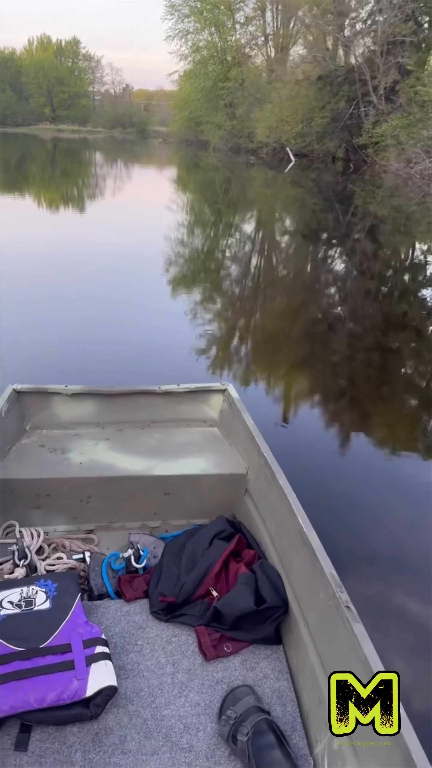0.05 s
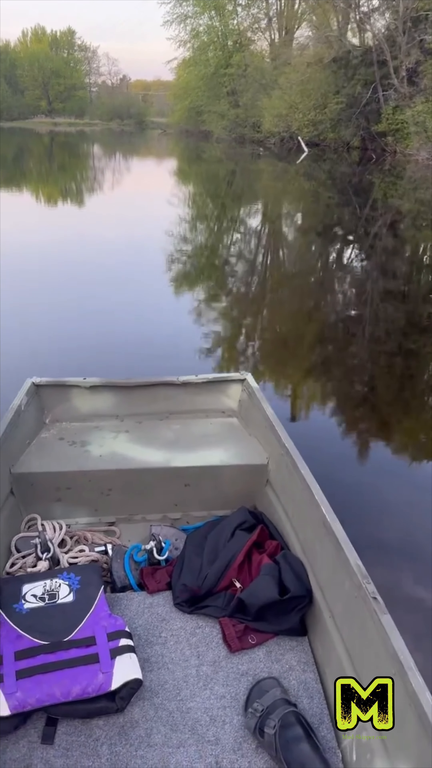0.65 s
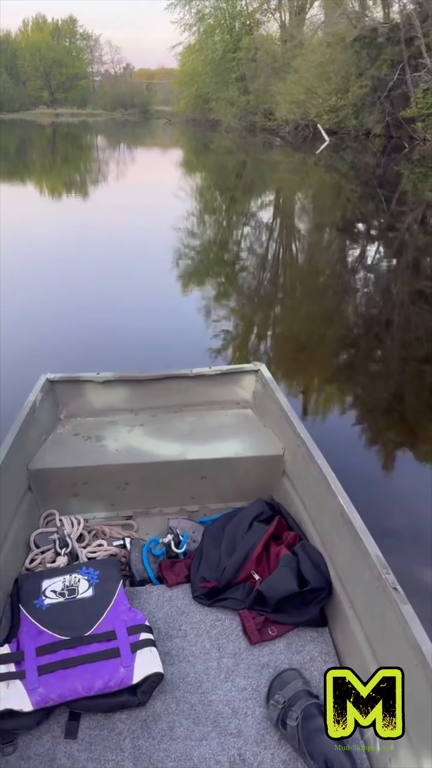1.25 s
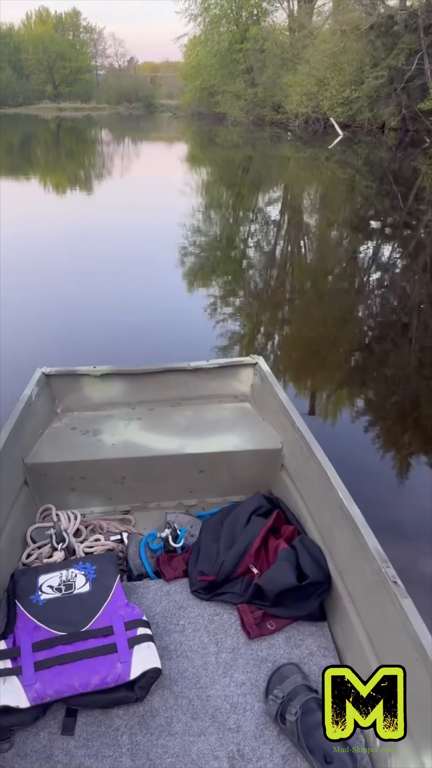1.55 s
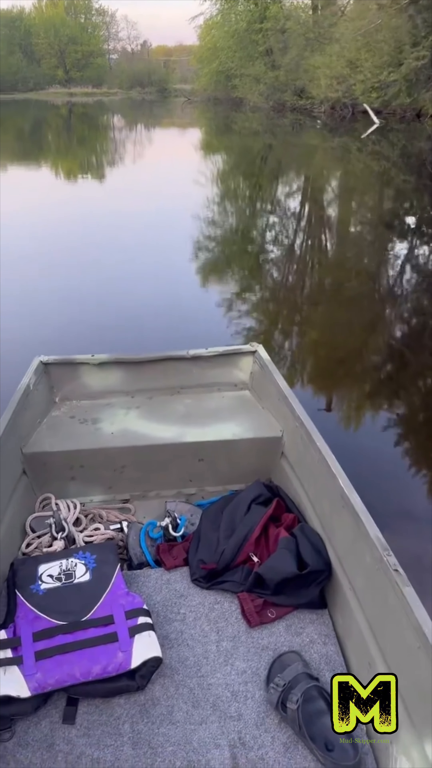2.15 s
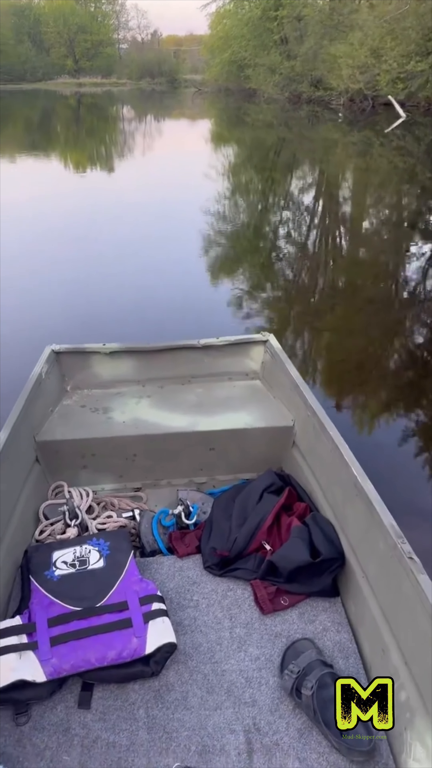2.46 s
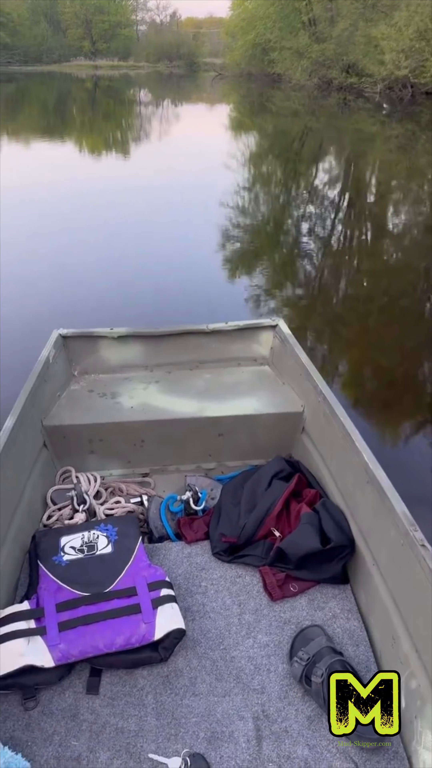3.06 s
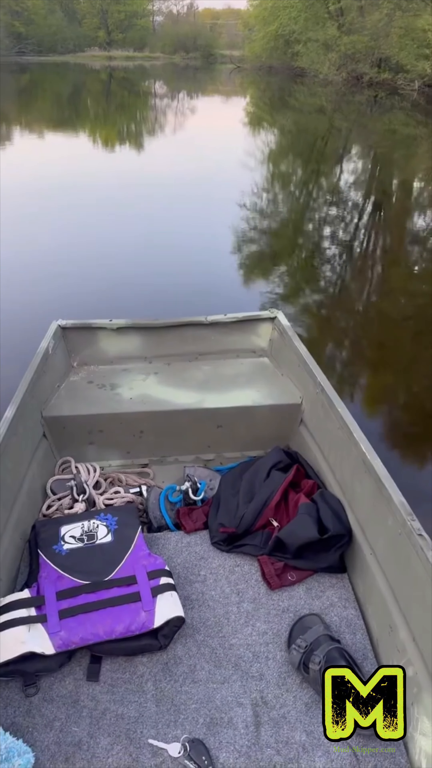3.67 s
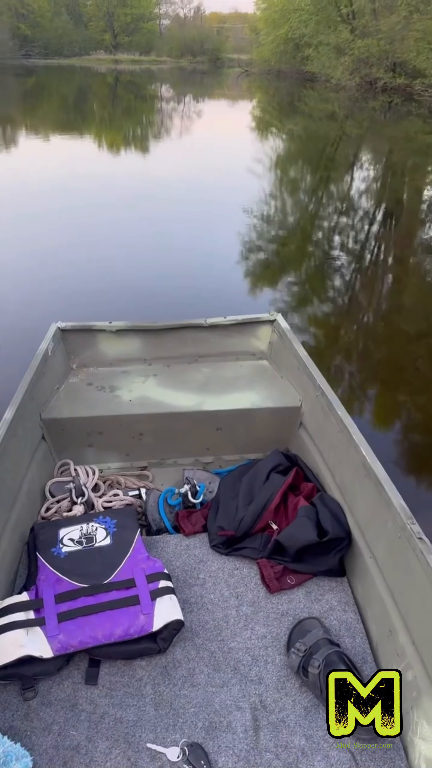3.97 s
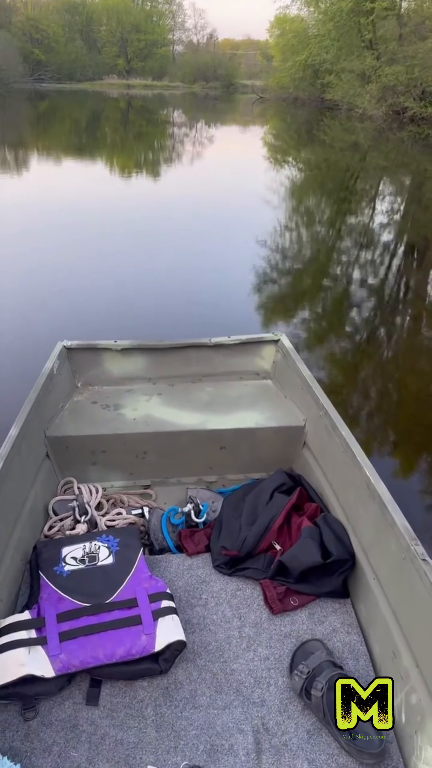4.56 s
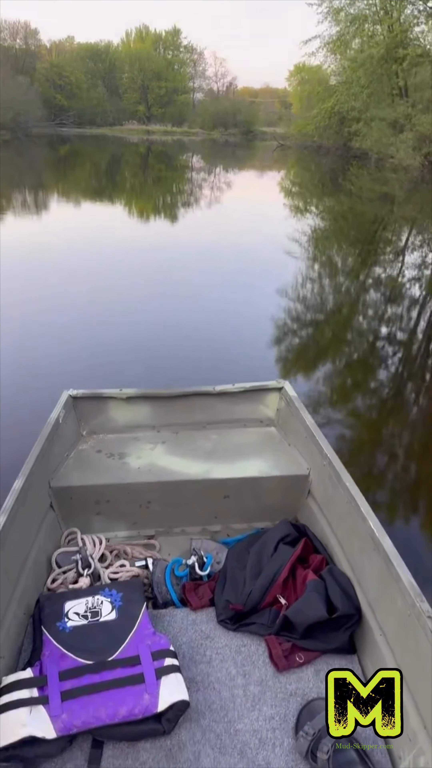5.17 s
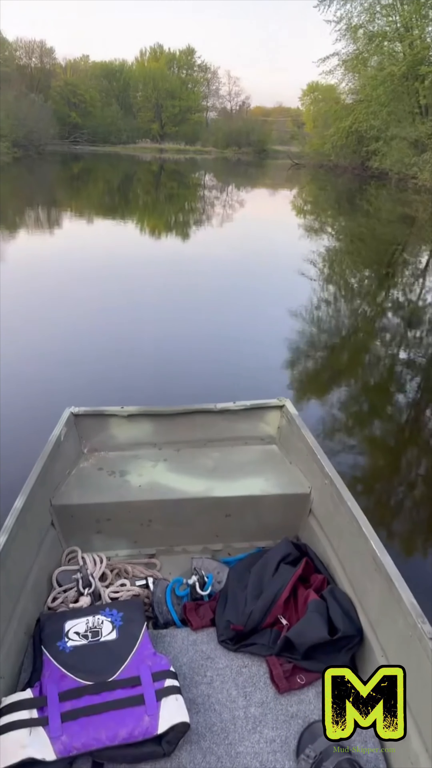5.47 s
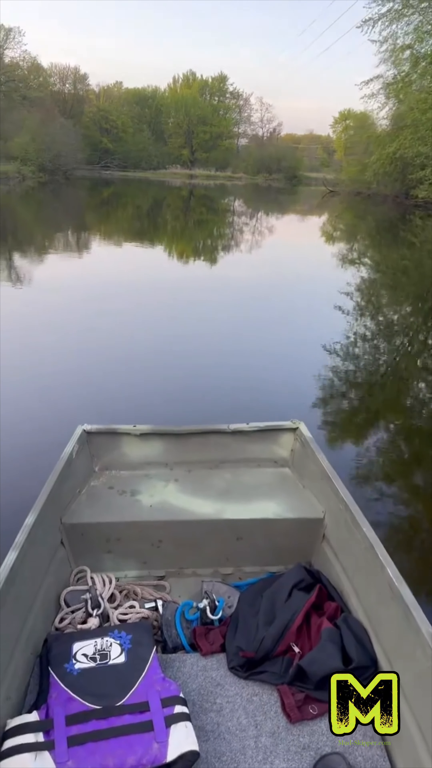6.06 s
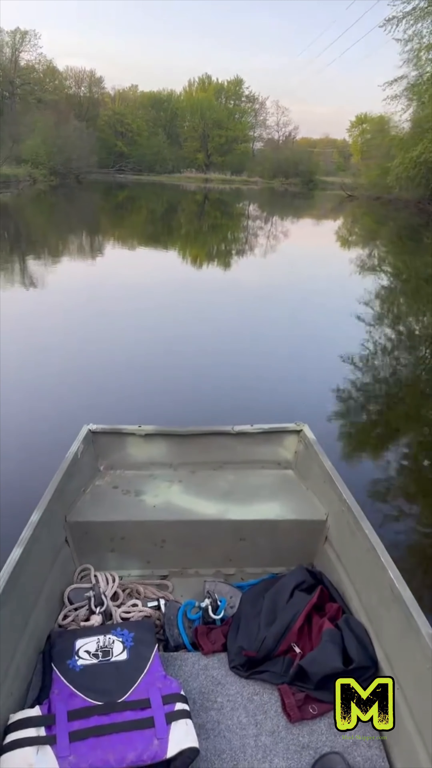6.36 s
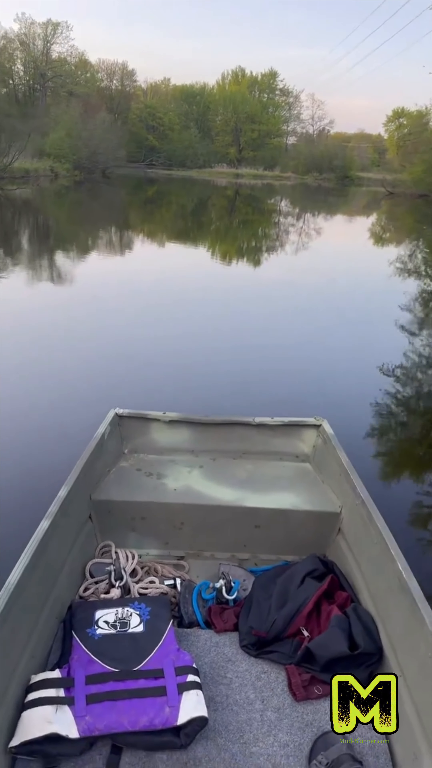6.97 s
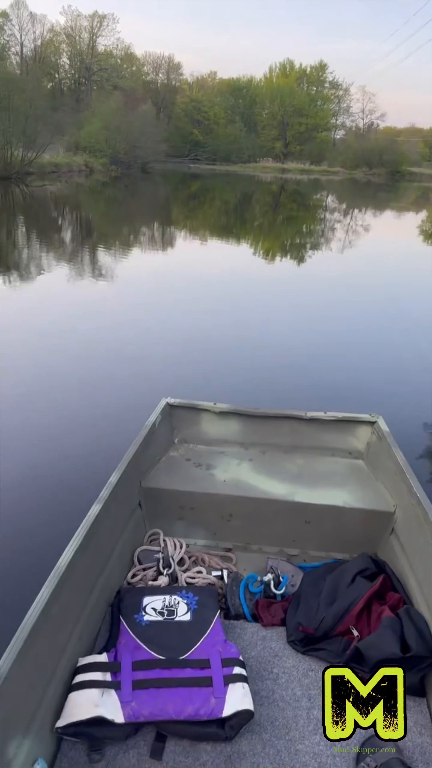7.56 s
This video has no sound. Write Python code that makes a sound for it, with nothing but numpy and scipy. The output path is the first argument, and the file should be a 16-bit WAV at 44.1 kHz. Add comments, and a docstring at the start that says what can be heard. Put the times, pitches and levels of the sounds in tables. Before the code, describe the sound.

Heard close from inside a small aluminium boat on calm water, a motor drones low and even from start to finish. Uneven firings add a rumble, while fast metallic clatter and short spells of panel buzz ride above it, along with a soft exhaust hiss and tiny ticks. The hull's boom dips briefly a few times, but the engine speed barely changes.

```python
"""A deep, steady engine drone fills a small aluminium boat on a calm river, heard on a phone held in
the open hull, a metre or two from the single-cylinder four-stroke long-tail motor. Each two-turn cycle
shakes the hull and uneven firings add rumble. The valve gear clacks and rattles, a loose panel buzzes in
spells, and gas hisses once a cycle with a thin tick; early echoes colour the treble."""
import sys
import numpy as np
from scipy import signal
from scipy.fft import rfft, irfft, next_fast_len
from scipy.io import wavfile
from scipy.ndimage import uniform_filter1d

SR = 44100
rng = np.random.default_rng(int(sys.argv[2]) if len(sys.argv) > 2 else 0)


def dump(signal):
    """Clip the signal to [-1, 1] and save it as 16-bit WAV at the path in sys.argv[1]."""
    limited = np.clip(np.atleast_2d(signal).T, -1, 1)
    pcm = np.round(limited * 32767).astype(np.int16)
    wavfile.write(sys.argv[1], SR, pcm)


N = 344855
TIME = np.arange(N) / SR

# pressure swings in one engine cycle: place/cycles, push (+) or pull (-)
STROKES = [(0.204, -0.52), (0.512, 0.77), (0.813, -0.497)]
# valve and piston knocks: place/cycles, relative level/dB
KNOCKS = [(0.025, 1), (0.273, -16.5), (0.469, -9), (0.769, -6), (0.867, -6)]


def drone(cycle, crank_db, boom_db, pipe_db, hull_below_hz=140, boom_order=6, upper_hz=380):
    """Multiples of the firing rate, timed by the strokes: the hull has the low ones, the pipe the rest."""
    # drone lines: multiple of the firing rate, relative left level/dB, relative right level/dB
    lines = [(1, -34, -30), (2, 0.5, 0.64), (3, -7, -8), (4, -13.5, -12.5), (5, -27, -21.5), (6, -2, -1),
             (7, -27.5, -28), (8, -16.5, -20), (9, -15, -13.5), (10, -18.5, -16.5), (11, -22, -24),
             (12, -20.5, -20.5), (13, -18, -15.5), (14, -18.5, -18), (15, -14.5, -41.5), (16, -18, -19.5),
             (17, -23.5, -35.5), (18, -20.5, -25), (20, -42.5, -35.5), (22, -27, -43), (23, -38, -37),
             (24, -31, -38.5), (25, -25.5, -34), (26, -25.5, -30.5), (29, -33, -34.5), (36, -31, -31.5),
             (49, -33.5, -41.5), (50, -42.5, -37), (56, -39.5, -36), (60, -43.5, -37)]
    # phase between left and right; the low lines sound centred, the midrange lines wide:
    # f/Hz, lead of the left/rad
    stereo_phase = [(60, 0.08), (125, 0.32), (187, 0.38), (250, 0.27), (320, 0.1), (490, 0.12), (560, 4.25),
                    (800, 2.97), (1030, 2.9), (1130, 3.14), (1500, 2.75), (1850, 2.75)]
    # dips and swells of the fourth line: t/s, gain/dB
    fourth_swells = [(0.0, 2), (0.75, -7), (1.25, -1), (1.8, 3), (2.45, -4), (2.7, 0), (3.55, -10),
                     (4.05, 0), (5.2, 1.8), (6.5, 2.5), (7.3, -0.5), (7.8, 3)]
    # swells of the lines above upper_hz: t/s, gain/dB
    upper_swells = [(0.0, 0.8), (1.2, 0.5), (2.6, -1.5), (4.1, 0.5), (5.8, -1), (6.3, 0.6), (7.8, 2)]
    at, push = np.transpose(STROKES)
    fourth_db, = curves(fourth_swells)
    upper_db, = curves(upper_swells)
    out = np.zeros((2, N))
    for order, left_db, right_db in lines:
        order = round(order)
        hz = order * cycle[-1] / TIME[-1]
        stroke_phase = np.angle(np.sum(push * np.exp(-2j * np.pi * order * at)))
        lead = np.interp(hz, *np.transpose(stereo_phase)) * np.array([[.5], [-.5]])
        drift = .09 * min(hz / 400, 1) * walk(22)  # hot gas shifts the upper lines a little
        if hz < hull_below_hz:  # the shaking of the crank is nearly steady
            db = crank_db + .5 * walk(14) + fourth_db * (order == 4)
        elif order == boom_order:
            db = boom_db
        else:  # the gas pulses vary
            db = pipe_db + 1.2 * walk(6) + upper_db * (hz > upper_hz)
        tone = np.cos(2 * np.pi * order * cycle + stroke_phase + drift + lead)
        out += undb([[left_db], [right_db]]) * undb(db) * tone
    return np.sqrt(2) * out


def hull_boom_db(firing_hz, steady_db=-30, db_per_sag_hz=17):
    """The hull booms louder as the engine sags under load and fades as the speed recovers."""
    return steady_db + db_per_sag_hz * (np.mean(firing_hz) - firing_hz)


def rumble(cycle, firing_at=.85, kick_db=-10, thud_width=.54):
    """Each firing kicks the hull harder or softer, and every stroke leaves a random thud."""
    # rumble spectrum: f/Hz, relative mid level/dB, relative side level/dB
    spectrum = [(25, -23, -39), (50, -15.5, -31), (120, -2, -25), (177, -4.5, -15.5), (245, -3, -18),
                (307, -9.5, -13), (442, -13, -9.5), (535, -8.5, -12), (593, -19, -14.5),
                (823, -24.5, -20.5), (920, -46, -42.5), (2000, -63.5, -80.5)]
    thuds = sum(abs(push) * burst(cycle, at + thud_width / 2, thud_width) for at, push in STROKES)
    envelope = unit(4.8 + thuds)
    kicks = unit(strikes(cycle, firing_at, rng.uniform(-.86, 1, cycle_count(cycle))))
    kicks = signal.sosfiltfilt(butter(2, 230, "low"), kicks)
    gas = carry_over(rng.standard_normal((2, N)), cycle, share=.4, above_hz=300)
    noise = coloured(envelope * gas + undb(kick_db) * kicks, spectrum)
    upper = signal.sosfiltfilt(butter(2, 380, "high"), noise)
    return noise + upper * (pan(db=9.5) - .9)  # the upper exhaust notes come more from the left


def hum(cycle, order=3.5, level_db=-37):
    """A weak, wavering hum between the third and fourth lines of the drone."""
    amplitude = np.sqrt(2) * undb(level_db + walk(3))
    return amplitude * np.cos(2 * np.pi * order * cycle + .92 * walk(3.6))


def rattle(cycle, level_db, width=.06, flutter_db=1.04):
    """Loose metal buzzes after each knock, partly alike on every cycle; its top lies to the right."""
    # hull and rig rattle: f/Hz, relative mid level/dB, relative side level/dB
    spectrum = [(293, -11, -18.5), (787, 3.5, -1), (970, -27.5, 6.5), (1170, -26, 10.5), (1375, -6, 6),
                (1465, 4.5, 1), (1640, 1.5, 6.5), (1720, 1.5, 3), (1900, 4, -1.5), (2530, -4, -13.5),
                (2600, -14, -12.5), (2770, -5, -25.5), (3290, -22.5, -34.5), (5100, -34, -38.5)]
    shakes = sum(undb(db / 2) * burst(cycle, at + width / 2, width) for at, db in KNOCKS)
    shaking = (1 + .5 * shakes) * undb(flutter_db * walk(90))
    vibration = carry_over(churn(cycle, repeat=.13), cycle, share=.16, above_hz=490)
    metal = coloured(shaking * vibration, spectrum)
    upper = signal.sosfiltfilt(butter(3, 1550, "high"), metal)
    wide = (metal - upper) * pan(db=1.5) + upper * pan(db=-6.5)
    return undb(level_db) * wide + centre_rattle(shaking * churn(cycle, repeat=.3)[0])


def centre_rattle(vibration, width_hz=293):
    """In spells, a band of the otherwise wide rattle is also heard dead centre."""
    # spells in the centre: start t/s, end t/s, lower edge f/Hz, level/dB
    spells = [(1.072, 1.546, 1070, -44), (1.702, 2.1, 1070, -44.5), (2.495, 2.949, 1073, -43.5),
              (3.227, 3.395, 1067, -43.5), (3.92, 4.156, 810, -46.5), (4.142, 5.177, 1077, -44),
              (5.185, 5.41, 1064, -41), (5.733, 6.193, 1060, -43.5), (6.647, 7.02, 833, -47),
              (6.657, 7.11, 1066, -42.5), (7.316, 7.356, 1092, -40)]
    out = np.zeros(N)
    for start, end, low_hz, db in spells:
        band = signal.sosfilt(butter(4, [low_hz, low_hz + width_hz], "band"), vibration)
        out += undb(db) * unit(band) * spell(start, end, fade_s=.04)
    return out


def panel_buzz(cycle, band_hz=(1445, 1615), knock_db=-4):
    """Something loose, likely a thin panel, is shaken by the knocks and rings in one band."""
    # spells of buzzing: start t/s, end t/s, level/dB
    spells = [(0.152, 0.69, -44.5), (0.937, 1.12, -42), (1.377, 1.672, -43), (2.534, 2.92, -42),
              (3.264, 3.465, -43), (3.927, 4.204, -43.5), (4.345, 4.799, -42.5), (5.298, 5.72, -45),
              (6.982, 7.172, -42)]
    hits = knocks(cycle, scatter_db=3)
    shaking = churn(cycle, repeat=.45) + undb(knock_db) * unit(hits)
    ring = unit(signal.sosfilt(butter(2, band_hz, "band"), shaking))
    return ring * sum(undb(db) * spell(start, end, fade_s=.15) for start, end, db in spells)


def clacks(cycle):
    """The knocks of valves and piston ring the engine casing."""
    # casing resonances: f/Hz, width/Hz, relative left level/dB, relative right level/dB
    modes = [(1535, 61, 4.5, -5.5), (1770, 18, 2, 9), (1868, 42, -0.5, 9), (1980, 910, -11.5, -12.5),
             (2120, 70, -11, 1), (2448, 120, 0, 2)]
    hits = knocks(cycle, scatter_db=1)
    casing = np.zeros((2, N))
    for hz, width_hz, left_db, right_db in modes:
        ring = signal.lfilter(*signal.iirpeak(hz, hz / width_hz, fs=SR), hits)
        casing += undb([[left_db], [right_db]]) * ring
    return unit(signal.sosfilt(butter(3, [1300, 2400], "band"), casing))


def knocks(cycle, scatter_db):
    """Valves and piston strike at set crank angles, harder or softer each time."""
    count = cycle_count(cycle)
    return sum(strikes(cycle, at, undb(db + scatter_db * rng.standard_normal(count))) for at, db in KNOCKS)


def gas_hiss(cycle, grain_db=.2, swell_db=1.27, flicker_db=.85, whole_over_treble_db=2.5):
    """Gas rushes through the exhaust and, more softly, the intake, over a hiss whose top flickers."""
    # hiss spectrum: f/Hz, relative mid level/dB, relative side level/dB
    spectrum = [(1500, -15.5, -24), (2970, 3, -1), (3860, 5, 1), (4265, 2.5, -3.5), (4860, -12, -22),
                (5400, 0, -9), (6500, 5, -3), (7200, -3.5, -12.5), (7600, -0.5, -8.5), (8300, -5, -8),
                (9170, -1.5, -22), (9830, -21.5, -16)]
    # slow course of the hiss above about 5 kHz: t/s, level/dB
    treble_levels = [(0.0, -53.7), (0.55, -54.3), (1.0, -53.3), (1.8, -53.9), (2.2, -54.7), (3.75, -55),
                     (4.0, -53.3), (4.85, -54), (5.2, -53.2), (5.7, -53.2), (6.2, -52.2), (6.8, -53.5),
                     (7.4, -53.6), (7.8, -52.2)]
    puffs = 1 + .62 * burst(cycle, at=.585, width=.07)
    puffs += .27 * burst(cycle, at=.17, width=.07) + .12 * burst(cycle, at=.78, width=.08)
    waver = undb(grain_db * walk(250) + swell_db * walk(11))
    gas = coloured(puffs * waver * churn(cycle, repeat=.038), spectrum)
    gas = brighten(gas, flicker_db * walk(110), above_hz=6900)
    treble_db, = curves(treble_levels)
    mean_db = np.mean(treble_db)
    return undb(mean_db + whole_over_treble_db) * brighten(gas, treble_db - mean_db, above_hz=4900)


def ticks(cycle, at=.57, scatter_db=11, ring_s=.00097, band_hz=(7360, 7960)):
    """Something small and metallic ticks with each exhaust puff, mostly faintly, now and then sharply."""
    # slow course of the ticking: t/s, level/dB
    levels = [(0.0, -63), (0.7, -69), (1.2, -63.5), (1.9, -70), (3.7, -74.5), (5.3, -69), (6.2, -66),
              (7.8, -67)]
    sizes = undb(scatter_db * rng.uniform(-1, 1, cycle_count(cycle)))
    hits = strikes(cycle, at, sizes, jitter_s=.0008)
    decays = signal.lfilter([1], [1, -np.exp(-1 / (ring_s * SR))], hits)
    scrape = decays * rng.standard_normal(N)
    level_db, = curves(levels)
    return undb(level_db) * unit(signal.sosfilt(butter(2, band_hz, "band"), scrape))


def wall_bounces(clatter):
    """Weak reflections off the near hull walls, different left and right; the level stays."""
    # wall reflections: delay/s, left gain, right gain
    paths = [(.0032, .15, .05), (.00748, 0, .2), (.00862, .15, .13), (.01522, .15, .1), (.02017, -.12, .1),
             (.02516, .06, .12)]
    out = clatter.copy()
    for delay_s, left, right in paths:
        out += np.array([[left], [right]]) * np.roll(clatter, round(delay_s * SR), axis=1)
    return out * np.std(clatter) / np.std(out)


def early_echoes(hiss):
    """Inverted echoes, most likely off the bow and benches, comb the hiss; the level stays."""
    # echo paths: delay/s, further lag on the right/s
    paths = [(.01523, -.00005), (.02012, .00009), (.02518, .00007)]
    # strength of each echo against the direct sound: level/dB
    levels = [-20, -11.5, -21]
    out = hiss.copy()
    for (delay_s, lag_s), db in zip(paths, levels):
        left = np.roll(hiss[0], round(delay_s * SR))
        right = np.roll(hiss[1], round((delay_s + lag_s) * SR))
        out -= undb(db) * np.array([left, right])
    return out * np.std(hiss) / np.std(out)


def hollow_centre(mix):
    """Twice a band near 1.1 kHz briefly leaves the centre and is heard only at the sides."""
    # hollow spells: start t/s, end t/s, lower edge f/Hz, upper edge f/Hz, side gain/dB
    spells = [(1.587, 1.678, 816, 1300, 3), (5.417, 5.71, 1015, 1295, 4)]
    out = mix.copy()
    for start, end, low_hz, high_hz, side_db in spells:
        left, right = signal.sosfiltfilt(butter(4, [low_hz, high_hz], "band"), mix)
        extra_side = (undb(side_db) - 1) * np.array([left - right, right - left]) / 2
        out += spell(start, end, fade_s=.04) * (extra_side - (left + right) / 2)
    return out


def churn(cycle, repeat, points=1400):
    """Two dense vibrations; the share `repeat` returns on every cycle and forms a comb of lines."""
    pattern = rng.standard_normal((2, points))[:, (cycle % 1 * points).astype(int)]
    return np.sqrt(repeat) * pattern + np.sqrt(1 - repeat) * rng.standard_normal((2, N))


def carry_over(x, cycle, share, above_hz):
    """Each cycle partly repeats the one before, which gathers the noise around the engine's lines."""
    high = signal.sosfiltfilt(butter(3, above_hz, "high"), x)
    before = np.array([np.interp(cycle - 1, cycle, channel) for channel in high])
    return x - high + (high + share * before) / np.hypot(1, share)


def strikes(cycle, at, sizes, jitter_s=.00003):
    """One impulse a cycle at a set crank angle, each with its own size."""
    when = np.interp(np.arange(len(sizes)) + at, cycle, TIME, right=-1)
    when += jitter_s * rng.standard_normal(len(sizes))
    heard = (when > 0) & (when < TIME[-1])
    return np.bincount((when[heard] * SR).astype(int), sizes[heard], N)


def cycle_count(cycle):
    """How many engine cycles begin."""
    return int(cycle[-1]) + 1


def burst(cycle, at, width):
    """A smooth bump once a cycle; place and width are shares of the cycle."""
    return np.exp(-.5 * (((cycle - at + .5) % 1 - .5) / width) ** 2)


def spell(start, end, fade_s):
    """Fade in, hold, fade out."""
    return np.clip(.5 + np.minimum(TIME - start, end - TIME) / fade_s, 0, 1)


def walk(rate_hz):
    """Random levels held 1 / rate_hz s and smoothed twice; rms 1."""
    hold = int(SR / rate_hz)
    held = np.repeat(rng.standard_normal(N // 100)[:N // hold + 1], hold)
    return unit(uniform_filter1d(uniform_filter1d(held, hold), hold)[:N])


def curves(table):
    """The columns of a timed table, one value a sample."""
    times, *columns = np.transpose(table)
    return [np.interp(TIME, times, column) for column in columns]


def coloured(source, spectrum):
    """Left and right from two signals, shaped by a mid and a side spectrum; the mid has rms 1."""
    hz, *levels = np.transpose(spectrum)
    size = next_fast_len(N + 4096)
    log_hz = np.log(np.maximum(np.arange(size // 2 + 1) * SR / size, 1))
    gains = undb([np.interp(log_hz, np.log(hz), db) for db in levels])
    mid, side = irfft(rfft(source, size) * gains, size)[:, :N]
    return np.array([mid + side, mid - side]) / np.std(mid)


def brighten(x, db, above_hz):
    """Raise or lower the treble over time."""
    return x + (undb(db) - 1) * signal.sosfiltfilt(butter(4, above_hz, "high"), x)


def butter(order, hz, kind):
    """Sections of a filter with a flat passband."""
    return signal.butter(order, hz, kind, fs=SR, output="sos")


def pan(db):
    """Gains for a left-minus-right level."""
    return undb(np.array([[db], [-db]]) / 2)


def undb(db):
    """Decibels to gain."""
    return 10 ** (np.asarray(db) / 20)


def unit(x):
    """Scale to rms 1."""
    return x / np.sqrt(np.mean(x ** 2))


def scene():
    """One crank drives every layer; it runs slightly early or late from firing to firing."""
    # engine speed, hunting a little at steady throttle: t/s, firing rate f/Hz
    speed = [(0.0, 31.0), (0.75, 31.33), (1.0, 30.91), (1.2, 31.34), (1.6, 31.02), (1.75, 31.37),
             (2.46, 31.05), (2.61, 31.45), (3.06, 31.13), (3.71, 31.29), (4.21, 31.12), (5.97, 31.34),
             (6.22, 30.87), (6.47, 31.27), (7.02, 30.89), (7.17, 31.25), (7.82, 30.83)]
    # slow swells about the steady levels: t/s, crank/dB, hull boom/dB, exhaust/dB, rattle/dB
    swells = [(0.0, -0.7, -9, -1.1, 0.0), (0.35, -0.7, -1.5, -1.0, 0.0), (1.55, -0.7, 2, -0.5, 0.3),
              (2.0, -1.3, 0, -1.0, -0.7), (2.45, -0.6, -1, -0.8, 0.3), (2.63, -0.2, -8, -0.7, 1.2),
              (2.95, 0.2, -1, -0.7, 0.8), (3.67, 1.1, -3, -1.1, -0.7), (3.96, 0.3, 3, 0.0, 1.5),
              (4.55, 0.6, 3.5, 0.2, 1.6), (4.9, 0.8, 4.5, 0.4, 0.0), (5.26, 0.9, 5, 0.7, -0.2),
              (5.46, 0.9, 0, -0.4, 0.6), (6.27, 0.2, 1, 1.1, -1.4), (7.07, -0.0, -1, 1.6, 1.1),
              (7.52, 0.1, -7, 1.4, -2.1), (7.82, -0.7, -4.5, 0.3, 0.4)]
    firing_hz, = curves(speed)
    crank_db, boom_db, exhaust_db, rattle_db = curves(swells)
    cycle = -.09 + np.cumsum(firing_hz) / SR + .00054 * walk(31) + .0016 * walk(7)
    clatter = undb(rattle_db - 47.5) * clacks(cycle) + rattle(cycle, rattle_db - 41.5) + panel_buzz(cycle)
    hiss = gas_hiss(cycle)
    engine = drone(cycle, crank_db - 18, boom_db + hull_boom_db(firing_hz), exhaust_db - 18) + hum(cycle)
    engine += undb(exhaust_db - 27.5) * rumble(cycle)
    return hollow_centre(engine + wall_bounces(clatter) + early_echoes(hiss) + ticks(cycle))


def record(dry, top_hz=9700):
    """The phone in the hull cuts the top steeply."""
    return signal.sosfilt(signal.ellip(10, .2, 80, top_hz, fs=SR, output="sos"), dry)


dry = scene()
out = record(dry)
dump(out)
```